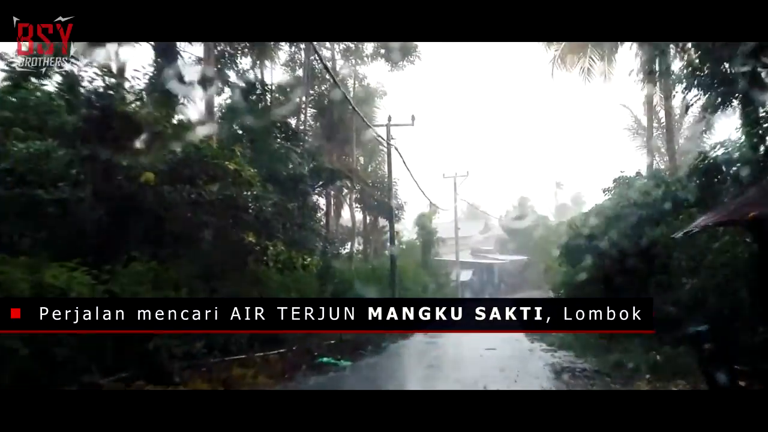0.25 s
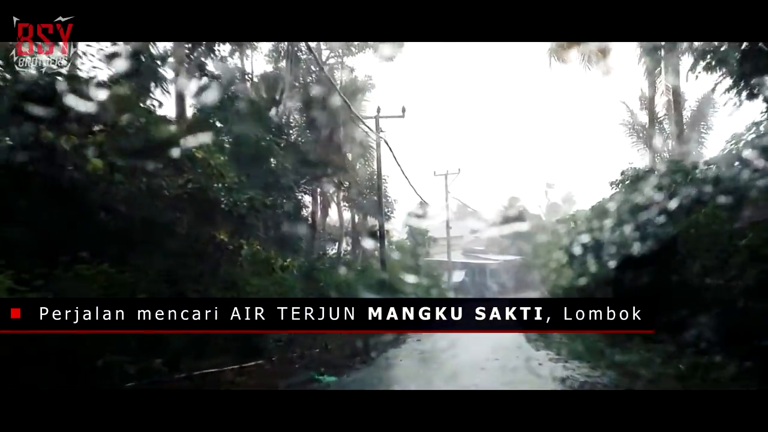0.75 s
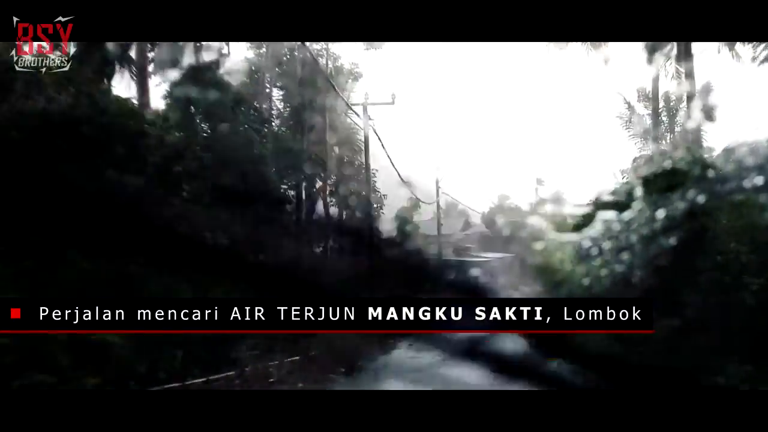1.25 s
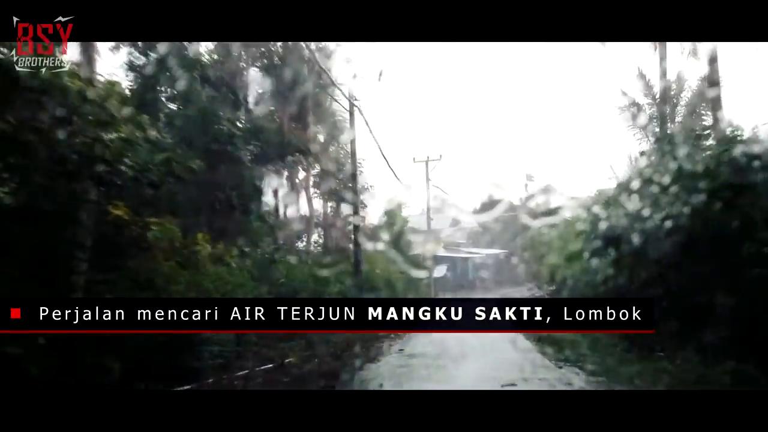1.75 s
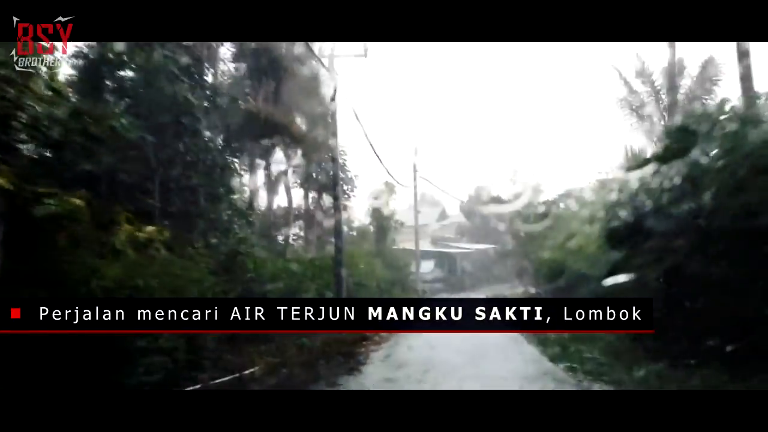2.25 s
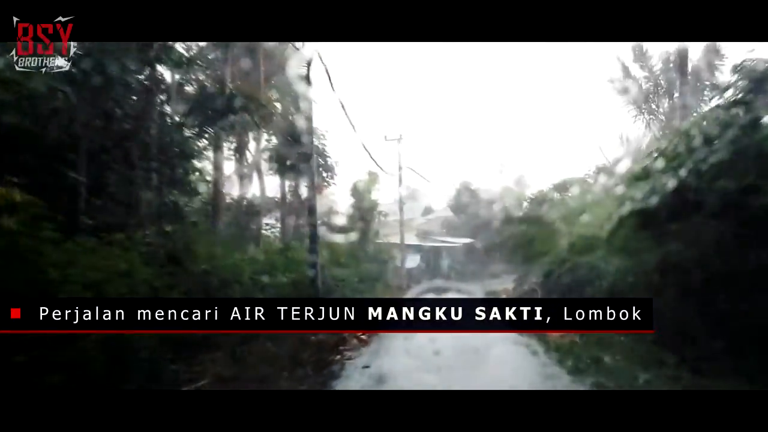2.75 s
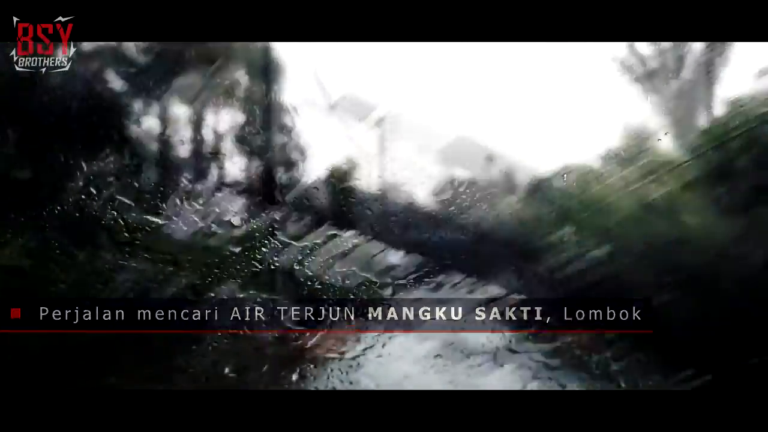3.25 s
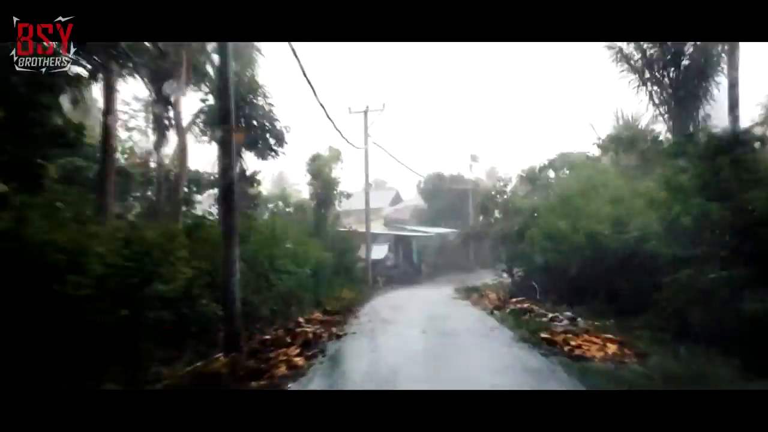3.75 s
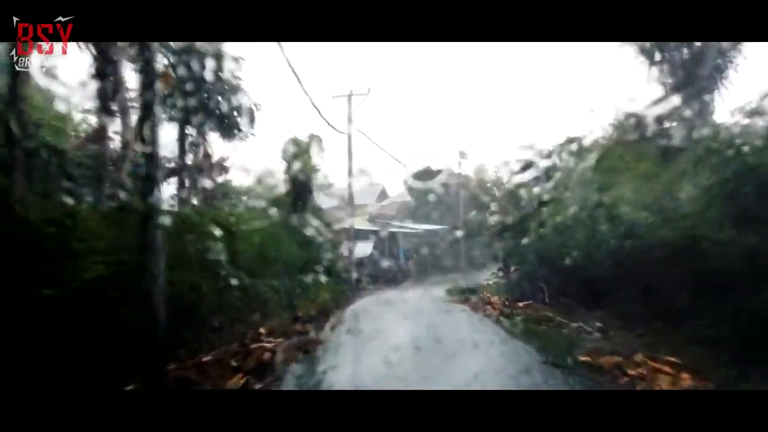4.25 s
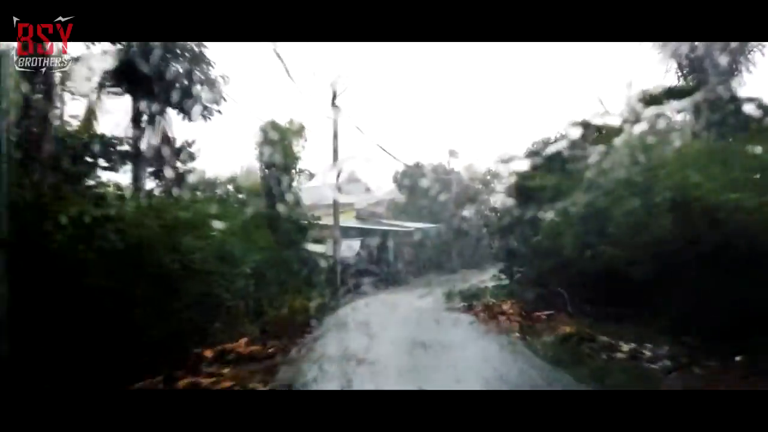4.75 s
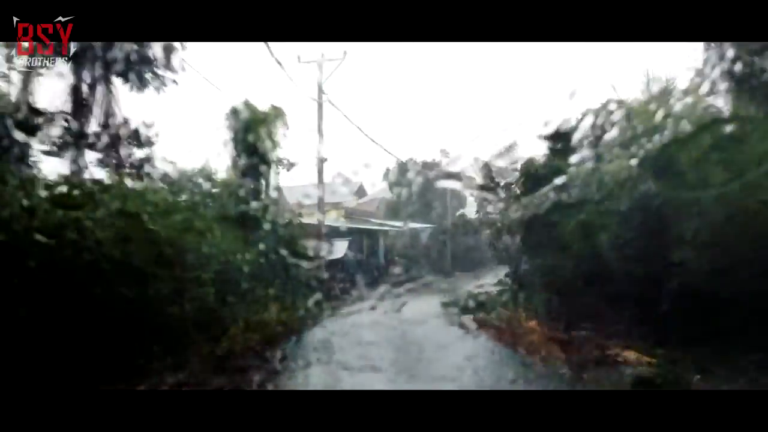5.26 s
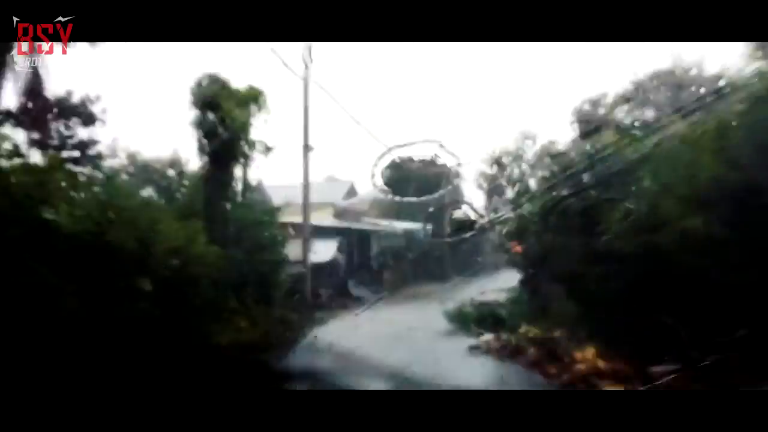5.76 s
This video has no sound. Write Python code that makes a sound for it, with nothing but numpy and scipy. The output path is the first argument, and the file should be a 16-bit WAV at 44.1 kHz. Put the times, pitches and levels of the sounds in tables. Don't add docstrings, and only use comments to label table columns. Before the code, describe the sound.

Heard from inside a small cabin by two spaced microphones: steady rain spray and tapping drops, a rumbling wet road beneath, and dull wiper thuds alternating firm and soft. The engine rises in pitch, then falls back and hums low. Road bumps and jolts grow stronger midway. The rain thins briefly near four seconds, big branch drips rattle down, then the rain returns heavier before easing at the end.

```python
import sys
import numpy as np
from scipy import signal
from scipy.fft import rfft, irfft, next_fast_len
from scipy.io import wavfile
from scipy.ndimage import uniform_filter1d

SR = 44100
rng = np.random.default_rng(int(sys.argv[2]) if len(sys.argv) > 2 else 0)


def undo_db(level):
    steps = np.asarray(level, float) / 20
    return 10 ** steps


def materialize(psi):
    bounded = np.clip(np.atleast_2d(psi).T, -1, 1)
    quanta = np.round(bounded * 32767).astype(np.int16)
    wavfile.write(sys.argv[1], SR, quanta)


N = 264820


def evened(x):
    return x / np.sqrt(np.mean(x ** 2) + 1e-20)


def read(points, hz):
    f, value = np.transpose(points)
    return np.interp(np.log(hz + 1), np.log(f + 1), value)


def curves(rows):
    s, *columns = np.transpose(rows)
    return [np.interp(np.arange(N) / SR, s, column) for column in columns]


def resonate(x, hz, width):
    return signal.lfilter(*signal.iirpeak(hz, hz / width, SR), x)


def smooth(x, size, axis=-1):
    return uniform_filter1d(x, size=size, axis=axis)


def slow(span):
    return evened(smooth(smooth(rng.standard_normal(N), int(span)), int(span)))


def pan(db):
    return np.array([[db], [-db]]) / 2


# f/Hz, likeness [-1 to 1]
LIKENESS = [(60, 1), (160, 1), (270, 1), (430, 0.13), (560, 0.79), (800, 0.12), (1200, -0.41),
            (1600, -0.059), (1900, -0.0021), (2500, 0.035), (2950, -0.031), (3700, -0.087), (4300, -0.13),
            (5400, 0.2), (6500, -0.071)]


def noise(shape, size, patchy_db):
    frames = 4 * N // size + 5
    hz = np.fft.rfftfreq(size, 1 / SR)
    a, b, c, d, patches = rng.standard_normal((frames, len(hz), 5)).T
    patches = evened(smooth(smooth(patches, 12, axis=0), 10, axis=1))
    same = np.clip(read(LIKENESS, hz), -1, 1)[:, None]
    left = a + 1j * b
    right = same * left + np.sqrt(1 - same ** 2) * (c + 1j * d)
    z = np.array([left, right]) * undo_db(read(shape, hz)[:, None] + patchy_db * patches)
    return evened(signal.istft(z, nperseg=size, noverlap=3 * size // 4)[1][:, :N])


def echoes(t60):
    t = np.arange(3000) / SR
    signs = rng.choice([-1., 1.], (2, len(t)))
    taps = signs * (rng.random((2, len(t))) < .1) * undo_db(-60 * t / t60)
    return taps / np.linalg.norm(taps, axis=1, keepdims=True)


def heard(left, right, far_db, wet_db, t60):
    spacing = 19
    at_left = left + undo_db(far_db) * np.roll(right, spacing)
    at_right = right + undo_db(far_db) * np.roll(left, spacing)
    tail = signal.oaconvolve((left + right)[None], echoes(t60), axes=1)[:, :N]
    return np.array([at_left, at_right]) + undo_db(wet_db) * tail


def steadied(x, share):
    envelope = abs(signal.hilbert(x, next_fast_len(N))[:N])
    return evened(x / (envelope + 0.16 * np.std(x)) ** share)


def swells(events, half_s):
    t = np.arange(0, N + 64, 64) / SR
    s, db = np.transpose(events)
    bells = np.exp(-((t - s[:, None]) / half_s) ** 2)
    power = (undo_db(2 * db)[:, None] * bells).sum(0)
    return np.interp(np.arange(N) / SR, t, power)


# t/s, level/dB
DOWNPOUR = [(0, -40), (.15, -36.5), (1.65, -36.5), (2.0, -34), (2.7, -34), (3.66, -34), (3.74, -39.5),
            (3.86, -42), (3.97, -38), (4.13, -38), (4.26, -36), (4.33, -33.5), (4.45, -32), (4.85, -32),
            (5.2, -30.5), (5.5, -31.5), (5.8, -34), (6, -38.5)]
# f/Hz, level/dB [per Hz]
SPRAY_COLOUR = [(150, -60), (250, -5), (348, -17.5), (698, -9.5), (816, -14), (1060, -10), (1180, -13.5),
                (1790, -12.5), (4050, -13), (5350, -17.5), (7440, -14.5), (9490, -19.5), (11500, -27.5),
                (14900, -30.5), (16000, -55)]
# f/Hz, width/Hz, level/dB
PANEL_RINGS = [(946, 480, 2), (1980, 1100, 0.5), (3900, 680, 7.5), (6700, 4100, -1.5), (9330, 480, -3),
               (14400, 1800, -6)]


def rain():
    hiss_db, = curves(DOWNPOUR)
    drum_db = -37.5 + 0.47 * (hiss_db + 33.5)
    drops_per_s = 350
    landed = rng.random((2, N)) < drops_per_s / SR
    size = undo_db(4.0 * np.minimum(rng.exponential(1, (2, N)), 4.2)) * landed
    panel = rng.integers(0, len(PANEL_RINGS), (2, N))
    taps = 0
    for k, (hz, width, db) in enumerate(PANEL_RINGS):
        hits = size * (panel != k) * rng.choice([-1, 1], N)
        taps = taps + undo_db(db) * evened(resonate(hits, hz, width))
    patter = evened(heard(*taps, far_db=-5.5, wet_db=-6.0, t60=0.013))
    spray = noise(SPRAY_COLOUR, size=512, patchy_db=1.0)
    low = signal.sosfiltfilt(signal.butter(2, 1250, fs=SR, output="sos"), spray)
    gust = undo_db(0.34 * slow(span=220) + 0.052 * slow(span=3500))
    high = evened(spray - low) * undo_db(1.5) + patter * undo_db(-8.0)
    return undo_db(hiss_db + 0.57) * gust * high + undo_db(drum_db + 3.0) * evened(low) * gust ** 0.57


# t/s, roughness level/dB
ROUGHNESS = [(0, -7.5), (.35, -7.5), (.75, -8.5), (1.2, -2.5), (1.6, -8.5), (2.08, -5), (2.3, 0), (2.6, -5),
             (3.0, -2), (3.35, -2), (3.7, -7), (4.05, -3.5), (4.4, -1.5), (4.9, -3.5), (5.15, -2.5),
             (5.6, 0), (6, -3)]
# f/Hz, level/dB [per Hz]
ROAR_COLOUR = [(35, -19), (60, -1), (79, -3), (113, -8), (212, -7.5), (349, -20), (450, -16.5),
               (580, -22.5), (990, -120)]
# t/s, peak level/dB
ROAD_DIPS = [(.43, -27.5), (.92, -42), (1.26, -22.5), (1.42, -31), (1.77, -28), (2.0, -25), (2.2, -29),
             (2.49, -23.5), (2.8, -24.5), (3.19, -22), (3.55, -23.5), (3.81, -16), (4.16, -17), (4.43, -27),
             (4.79, -35), (5.37, -23), (5.53, -30), (5.77, -25.5), (5.95, -29)]
# t/s, peak level/dB
ROAD_RIDGES = [(.01, -32), (.23, -36), (.46, -27.5), (.66, -29), (.84, -29), (.97, -32), (1.73, -25),
               (1.87, -21.5), (1.97, -23), (2.25, -30), (2.85, -27), (3.16, -41), (3.72, -21.5),
               (3.98, -18.5), (4.18, -22.5), (4.68, -19), (4.96, -20.5), (5.17, -28), (5.5, -19.5),
               (5.67, -27), (5.95, -16.5)]


def road():
    rough_db, = curves(ROUGHNESS)
    heave_db, boom_db, roar_db = -27, -27.5, -34.5
    bumps = rng.standard_normal((2, N))
    heave = steadied(resonate(resonate(bumps[0], 31.0, 19.6), 28.2, 23.0), share=0.98)
    boom = steadied(resonate(resonate(bumps[1], 49.7, 15.0), 56.7, 24), share=0.66)
    roar = noise(ROAR_COLOUR, size=4096, patchy_db=1.67)
    even_share, even_s = 0.44, 0.071
    roar_power = smooth((roar ** 2).mean(0), int(even_s * SR))
    roar = evened(roar / roar_power ** (even_share / 2))
    judder_db, judder_s = 4.5, 0.056
    judder = np.sqrt(2.0 + swells([(s, judder_db) for s, *_ in WIPER_TURNS], judder_s))
    heave = heave * np.sqrt(undo_db(2 * (heave_db + rough_db)) + swells(ROAD_DIPS, half_s=0.037))
    boom = boom * np.sqrt(undo_db(2 * (boom_db + rough_db)) + swells(ROAD_RIDGES, half_s=0.041))
    return heave + boom + undo_db(roar_db + 0.43 * rough_db + 2.5) * roar * judder


# t/s, firing f/Hz, throttle level/dB, exhaust load level/dB
ENGINE_COURSE = [(0, 60.8, -25, -4), (.8, 66.17, -19, 3.5), (1.05, 73.1, -3.5, -2.5), (1.2, 75.64, 0, 0),
                 (1.5, 79.45, -3, -1.5), (1.78, 83.9, -4.5, 0), (1.94, 86, 5, 3.5), (2.01, 86.5, -14, 4),
                 (2.25, 89.5, -2, 2.5), (2.45, 94.3, -2, -2), (2.75, 98.7, 1, 0.5), (2.9, 97.5, -10, 5),
                 (3.15, 80.77, -1.5, 0), (3.3, 73.9, -11, -6.5), (4.3, 72, -4.5, -1.5), (4.9, 69.9, -29, 1),
                 (5.2, 75.65, -8, -17), (6, 70, -9, -4)]
# f/Hz, width/Hz, level/dB
CABIN_RINGS = [(150, 23, -30), (168, 11.6, -30), (231.9, 13, -34), (400, 19, -41.5)]


def engine():
    hz, throttle_db, load_db = curves(ENGINE_COURSE)
    drone_hz, drone_width_hz, drone_db = 72, 8.3, 7.5
    drone = drone_db / (1 + (2 * (hz - drone_hz) / drone_width_hz) ** 2)
    tone_db = -31.5 + load_db + 0.46 * throttle_db + drone
    turns = 2 * np.pi * np.cumsum(hz * (1 + 0.0054 * slow(span=2100))) / SR
    out = undo_db(tone_db + 1.0 * slow(span=1900)) * np.sin(turns)
    for k in range(2, 7):
        lift = sum(undo_db(db) / (1 + (2 * (k * hz - f) / width) ** 2) for f, width, db in CABIN_RINGS)
        waver_db = 0.89 * np.sin(turns / 14 + k * k)
        out = out + undo_db(throttle_db + waver_db) * lift * np.sin(k * turns + k)
    return np.sqrt(2) * out


# t/s, peak level/dB, ring f/Hz, left minus right level/dB
FAT_DROPS = [(0.0047, -24.5, 6450, -3), (0.0645, -33, 3203, -2), (0.1182, -33, 4446, -2),
             (0.1526, -35, 2029, -1), (0.183, -27, 3116, -1), (0.259, -30, 1388, -3),
             (0.4585, -25, 5329, -4), (0.821, -23, 3500, 1), (0.9842, -24.5, 3068, -2),
             (1.0331, -26, 3970, -1), (1.044, -24, 2702, -4), (1.1347, -22, 2600, -2),
             (1.1724, -24, 1550, -10), (1.4459, -28, 2729, -3), (1.5187, -37, 3746, -3),
             (1.782, -26, 2546, -1), (1.8166, -27, 2842, -2), (2.2365, -20, 3097, -3),
             (2.3187, -18.5, 2115, 4), (2.742, -25, 5663, -3), (2.8801, -36, 1453, -2),
             (2.897, -25, 1647, 0), (2.9039, -30, 1534, -1), (3.13, -26, 3079, -5), (3.352, -22, 3036, -2),
             (3.5055, -19, 3030, -5), (3.634, -23.5, 4196, -12), (3.673, -25, 7644, -3),
             (3.805, -37, 1706, -3), (3.8861, -25.5, 2630, -5), (3.9017, -26, 4070, -7),
             (3.9704, -28, 3574, 0), (3.977, -25, 5500, -2), (4.0037, -20.5, 3149, -4),
             (4.0926, -28, 2196, -2), (4.22, -22, 2497, -7), (4.308, -18, 3176, -2), (4.684, -20, 6080, -6),
             (4.737, -18.5, 4500, -3), (4.9145, -21, 7210, -12), (5.0463, -17.5, 5316, -5),
             (5.184, -16, 4056, -5), (5.3195, -23, 5684, -3), (5.7, -17.5, 1198, -1),
             (5.9382, -21, 6150, 3)]


def ticks():
    t, out = np.arange(600) / SR, np.zeros((2, N + 600))
    for s, db, hz, pan_db in FAT_DROPS:
        burst = rng.standard_normal(len(t)) * (t / .0004) * np.exp(-t / 0.0007)
        ring = resonate(burst, hz, 2600)
        ring = ring + 0.34 * resonate(burst, 2700, 4500) + 0.1 * resonate(burst, 5200, 2800)
        at = round(s * SR)
        out[:, at:at + len(t)] += undo_db(db - 1.0 + pan(pan_db)) * ring / abs(ring).max()
    return out[:, :N]


# t/s, peak level/dB, thud f/Hz
WIPER_TURNS = [
    (.009, -21.5, 124.4),
    (0.6, -29.5, 136),
    (1.205, -21.5, 137.5),
    (1.8, -29.5, 138),
    (2.412, -25, 141.3),
    (3.02, -45, 142),
    (3.619, -23.5, 141),
    (4.201, -26.5, 144),
    (4.831, -23.5, 107.2),
    (5.441, -29, 140.8),
]
# f/Hz, level/dB, time to fall 60 dB [s]
GLASS_KNOCK = [(293, -3, 0.05), (356, -10, 0.27), (438, -13, 0.13)]


def wipers():
    t, out = np.arange(6000) / SR, np.zeros(N + 6000)
    knock = sum(undo_db(db - 60 * t / t60) * np.sin(2 * np.pi * hz * t) for hz, db, t60 in GLASS_KNOCK)
    snap_db, snap_s = 3.5, 0.0011
    snap = undo_db(snap_db) * t / snap_s * np.exp(1 - t / snap_s)
    for s, db, hz in WIPER_TURNS:
        thud = np.sin(2 * np.pi * hz * t) * undo_db(-60 * t / 0.35)
        out[round(s * SR):][:len(t)] -= undo_db(db) * (thud + knock + snap)
    return out[:N]


# t/s, peak level/dB, ring f/Hz
TYRE_THUMPS = [(0.162, -30, 147), (.287, -24, 290), (.342, -27, 132), (.395, -27.5, 190), (.56, -22.5, 158),
               (0.726, -36, 138), (.78, -25, 174), (0.857, -26, 188), (2.143, -31, 174.2),
               (2.31, -20.5, 213), (2.534, -29, 189), (2.719, -23, 190), (2.84, -20.5, 197),
               (2.894, -20, 264), (2.988, -21, 240.6), (3.061, -24, 119), (3.282, -33.5, 332),
               (3.339, -27, 215), (3.552, -21, 150.5), (3.679, -16.5, 102), (3.759, -28, 104.2),
               (3.87, -23.5, 149.6), (3.94, -29, 138), (4.302, -20.5, 158), (4.395, -20, 165.5),
               (4.471, -32, 151.4), (4.596, -24, 113.3), (4.651, -19, 102), (4.72, -17, 72),
               (4.683, -28, 182), (4.78, -20.5, 219.3), (4.902, -24, 201), (4.999, -27, 205.3),
               (5.22, -28.5, 176), (5.342, -20, 219.5), (5.397, -36, 172.6), (5.6, -26, 116),
               (5.732, -22, 192.5), (5.85, -21.5, 263), (5.929, -25, 278)]


def thumps():
    t, out = np.arange(5000) / SR, np.zeros(N + 5000)
    rise_s, t60_s = 0.0046, 0.14
    rise = 1 - np.exp(-t / rise_s)
    for s, db, hz in TYRE_THUMPS:
        ring = 1.21 * np.sin(2 * np.pi * hz * t)
        out[round(s * SR):][:len(t)] += undo_db(db - 60 * t / t60_s) * rise * ring
    return out[:N]


# t/s, peak level/dB, ring f/Hz, bright spit level/dB, left minus right level/dB
BRANCH_DRIPS = [(0.2354, -17, 1820, -14, -2), (0.5458, -19, 3200, -21, 2), (0.8095, -12, 3900, -9, 13),
                (0.8135, -19, 1800, -20, 2), (1.128, -13, 2500, -12, -4), (1.215, -22.5, 3226, -5, -27),
                (1.9817, -11, 3040, -2, 5), (2.8187, -21, 2479, -15, -1.5), (2.981, -29, 2970, -12, 0),
                (3.943, -25, 2299, -13, -1), (4.026, -7.5, 2690, -22, -1), (4.0592, -22, 1300, -4, -1),
                (4.113, -12, 4355, -7.5, -10), (4.114, -16, 2523, -18, -2),
                (4.1414, -10.5, 3414, -22, -1.5), (4.163, -16, 2500, -24, -2), (4.169, -7, 2200, -19, -2),
                (4.1752, -15, 2970, -16, 0), (4.1947, -12, 2000, -8, -9), (4.236, -18, 4340, -6, -17),
                (4.242, -14, 4520, -29, -1), (4.3223, -16, 2096, -26, 2), (4.948, -10.5, 2017, -29, -6),
                (5.218, -13, 5215, 4, -1), (5.601, -13, 2600, -17, -1.5), (5.6863, -18, 4000, 0, 1)]


def drips():
    t, out = np.arange(1500) / SR, np.zeros((2, N + 1500))
    soften = signal.butter(2, 6500, fs=SR)
    for s, db, hz, spit_db, pan_db in BRANCH_DRIPS:
        burst, splash = rng.standard_normal((2, len(t)))
        burst = burst * (t / 0.00033) * np.exp(-t / 0.00095)
        burst = burst + 0.034 * splash * np.exp(-t / 0.0076)
        burst = burst + 1.64 * np.exp(-((t - 0.0005) / 0.00004) ** 2)
        low = resonate(burst, hz, 2400)
        low = low + 1.24 * resonate(burst, 1400, 1600) + 0.63 * resonate(burst, 3900, 3100)
        spit = resonate(resonate(burst, 7300, 3200), 8160, 2500)
        ring = signal.lfilter(*soften, low) + undo_db(spit_db + 14.5) * spit
        at = round(s * SR)
        out[:, at:at + len(t)] += undo_db(db - 6.0 + pan(pan_db)) * ring / abs(ring).max()
    tail = signal.oaconvolve(out.mean(0)[None], echoes(t60=0.026), axes=1)
    return out[:, :N] + undo_db(-8.5) * tail[:, :N]


# t/s, peak level/dB, length [s]
ROAD_JOLTS = [
    (2.508, -14, 0.009),
    (2.583, -15, 0.0042),
    (2.844, -9.5, 0.01),
    (4.599, -10, 0.0062),
    (4.671, -16, 0.014),
    (4.7, -15, 0.0083),
]


def jolts():
    t, out = np.arange(3000) / SR, np.zeros(N + 3000)
    for s, db, length in ROAD_JOLTS:
        swing = 1.4 * np.sin(np.pi * t / length)
        out[round(s * SR):][:len(t)] += undo_db(db - 60 * t / (3.9 * length)) * swing
    return out[:N]


def scene():
    below = road() + engine() + wipers() + thumps() + jolts()
    bass_lag = 8
    below = np.array([below[0], np.roll(below[1], bass_lag)])
    return below + rain() + drips() + ticks()


# f/Hz, level/dB
THINNING = [(900, -30), (1300, -4.5), (3000, -3.5), (4200, -2), (5200, -.3), (6500, -1.3), (8500, .8),
            (11000, 1), (13500, .2), (15500, .2)]


def thin_treble(x):
    edge = smooth(np.diff(x, prepend=0) ** 2, 64).sum(0)
    sharp = edge > 4 * smooth(edge, 2048)
    opened = smooth(np.minimum(smooth(200. * sharp, 200), 1), 96)
    steady = x * (1 - opened)
    pair = np.array([steady[0] + steady[1], steady[0] - steady[1]]) / 2
    hz, t, z = signal.stft(pair, SR, nperseg=2048, noverlap=1536)

    def blurred(power, bins, frames):
        return smooth(smooth(power, bins, axis=1), frames, axis=2)

    power = abs(z) ** 2
    near = blurred(power, 3, 3)
    around = blurred(power, 32, 5)
    kept = z * np.where(near > around * undo_db(2 * read(THINNING, hz))[:, None], 1, .03)
    hole_db = -3.2
    patch = blurred(abs(kept) ** 2, 12, 3)
    region = blurred(abs(kept) ** 2, 48, 9)
    kept = kept * np.where((patch > region * undo_db(2 * hole_db)) | (hz < 3500)[:, None], 1, .03)
    left_over = blurred(abs(kept) ** 2, 32, 9)
    makeup = np.minimum(around / (left_over + 1e-20), 4) ** .5
    kept *= np.where(hz > 900, 1, 0)[:, None] * (makeup - 1) + 1
    mid, side = signal.istft(kept, SR, nperseg=2048, noverlap=1536)[1][:, :N]
    return opened * x + np.array([mid + side, mid - side])


# f/Hz, left minus right level/dB
MICROPHONE_LEAN = [(60, 4), (450, -0.5), (680, -3.5), (850, -0.5), (2000, -1), (5300, -1), (7100, -4),
                   (8300, -1), (9600, 7), (11500, -1.5), (13300, -2), (14000, -5), (15200, -22),
                   (16000, -7)]


def microphones(x):
    size = next_fast_len(N)
    hz = np.fft.rfftfreq(size, 1 / SR)
    bass_alike = np.clip(hz / 300 - .2, 0, 1)
    lean_db = (-.45 + read(MICROPHONE_LEAN, hz) * bass_alike) / 2
    band_limit = np.clip((15850 - hz) / 60, 0, 1)
    gains = undo_db(np.array([lean_db, -lean_db])) * band_limit
    return irfft(rfft(x, size) * gains, size)[:, :N]


def roll_off(x):
    return signal.sosfilt(signal.butter(12, 16690, fs=SR, output="sos"), x)


def record(dry):
    mix = microphones(thin_treble(dry)) + .003
    return roll_off(mix)


dry = scene()
out = record(dry)
materialize(out)
```